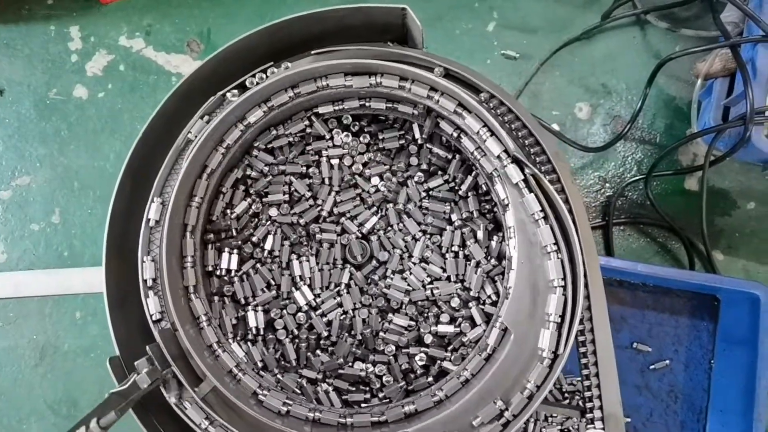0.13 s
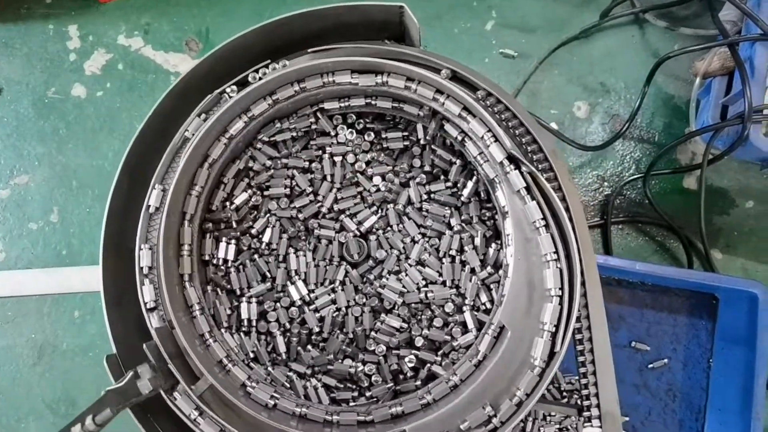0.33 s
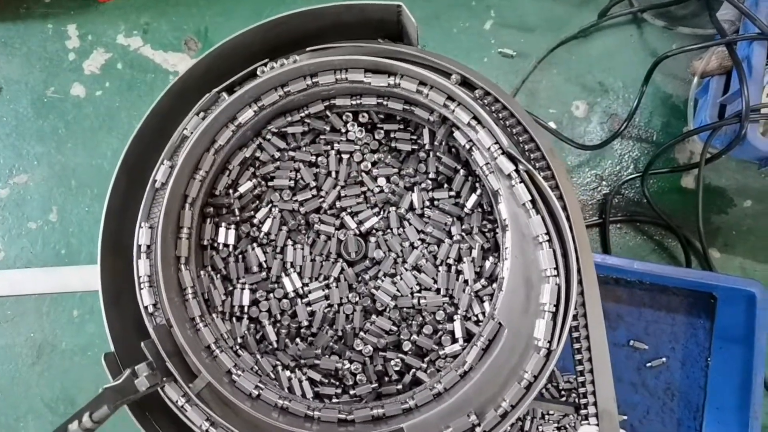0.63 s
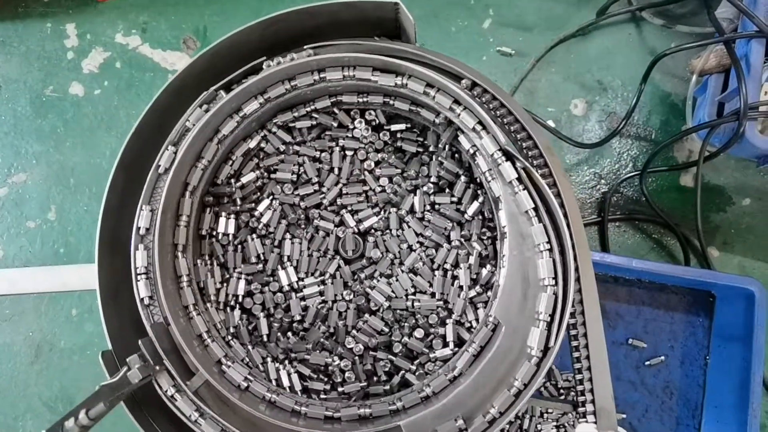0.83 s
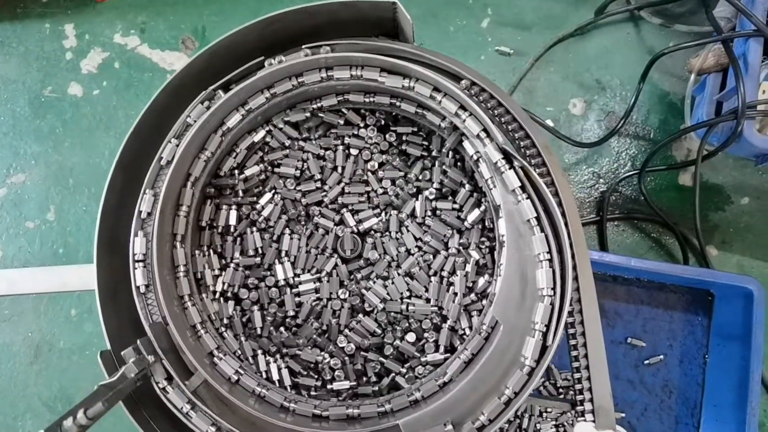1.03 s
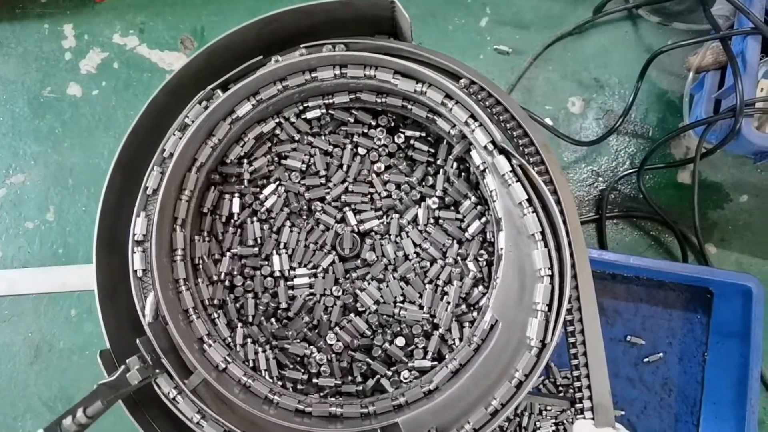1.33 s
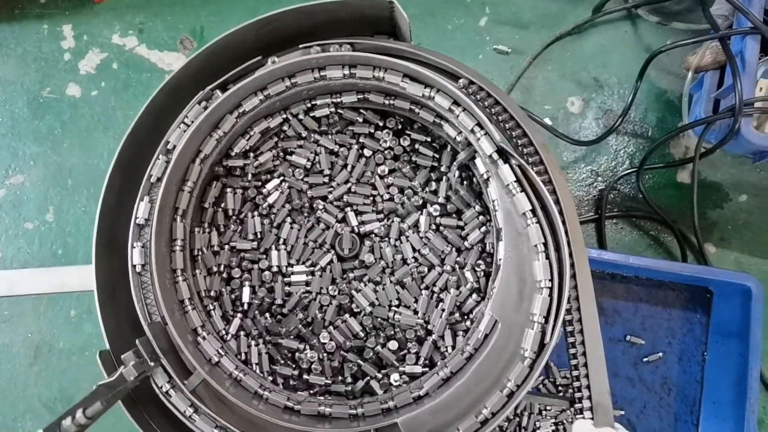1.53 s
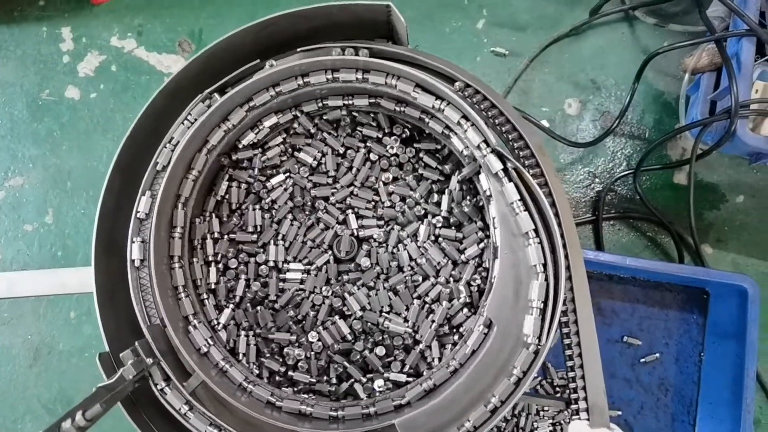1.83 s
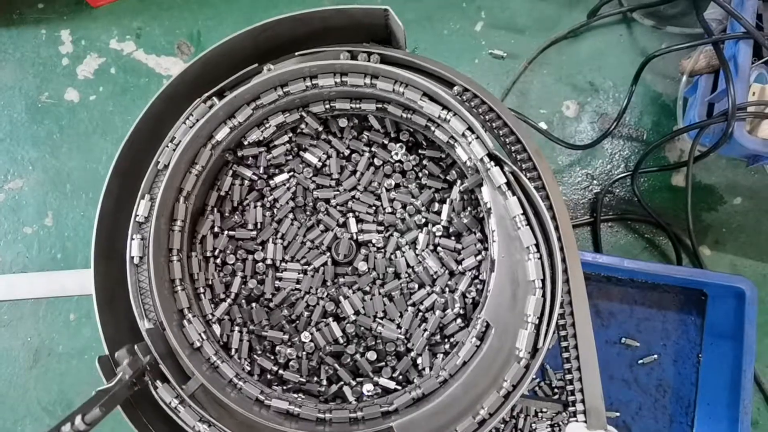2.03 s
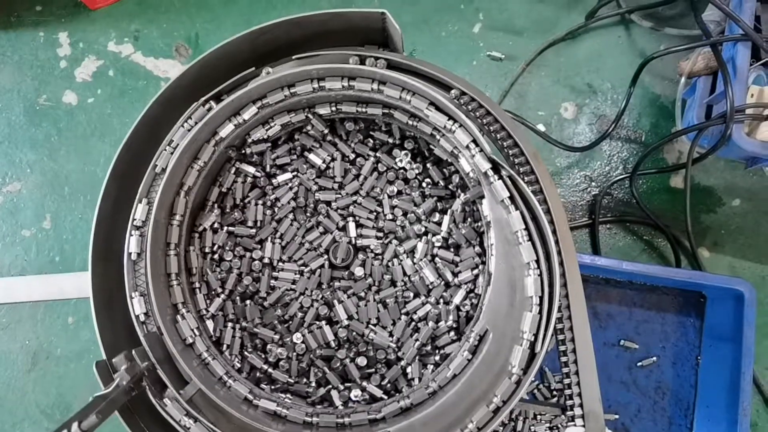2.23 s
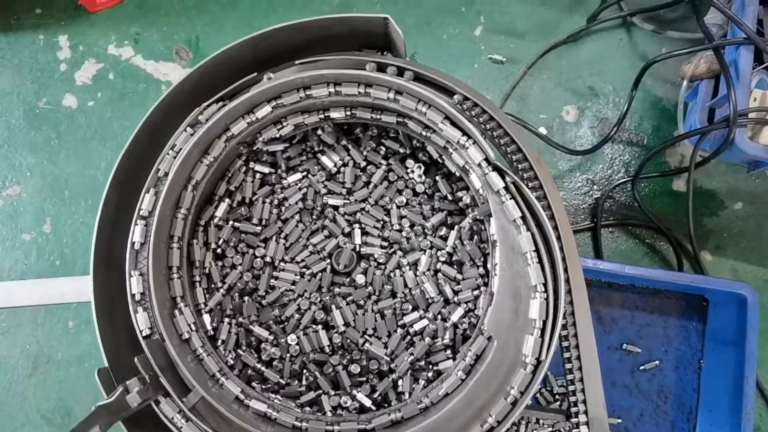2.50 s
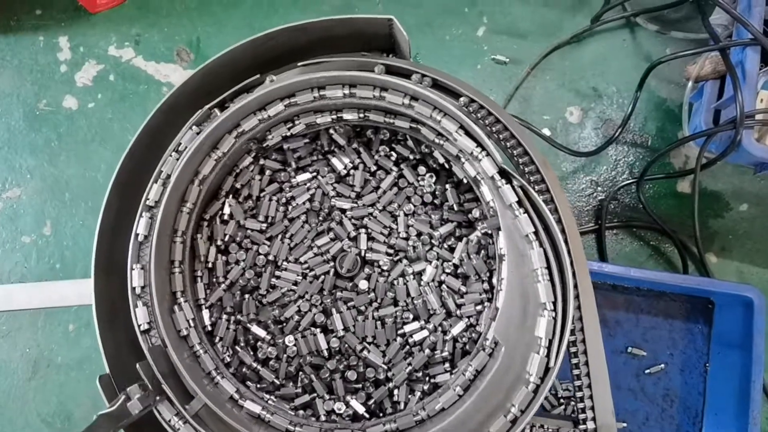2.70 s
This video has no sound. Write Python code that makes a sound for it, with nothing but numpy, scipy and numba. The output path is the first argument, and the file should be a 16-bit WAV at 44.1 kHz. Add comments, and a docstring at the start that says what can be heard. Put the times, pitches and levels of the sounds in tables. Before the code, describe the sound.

Vibratory bowl feeder buzzing fast, jostling a heap of tiny metal parts with bright continuous clatter

```python
"""A mains-driven bowl feeder shakes a heap of small steel parts, heard from above by a phone.
From the start, parts are thrown and land twice a stroke: thousands of collisions click and ring.
Under them the magnet drive hums, a motor drones nearby and the workshop rumbles (filtered noise).
From a quarter of a second on, harder knocks stand out: each clicks, rings many tones and bounces twice.
The rattle dips briefly near 0.28, 1.8 and 2.72 s; the last knock falls at 2.43 s and the drone sinks at the end."""
import sys
import numpy as np
from scipy import signal
from scipy.fft import rfft, irfft
from scipy.io import wavfile
from scipy.ndimage import uniform_filter1d
from numba import njit

SR = 44100
rng = np.random.default_rng(int(sys.argv[2]) if len(sys.argv) > 2 else 0)


def digitize_waveform(pressure):
    """Quantize a signal to 16-bit integers and store it at the path in sys.argv[1].

    Rows of a 2-D input are taken as channels; values are limited to [-1, 1].
    """
    field = np.atleast_2d(pressure).T
    bounded = np.clip(field, -1, 1)
    quanta = np.round(bounded * 32767).astype(np.int16)
    wavfile.write(sys.argv[1], SR, quanta)


N = 126126  # length in samples

DRIVE_HZ, DRIVE_START_TURNS = 49.973, .7  # one turn is one stroke
MOTOR_HZ, MOTOR_START_TURNS = 43.27, .4
MAIN_RING_LOW_HZ, MAIN_RING_HIGH_HZ = 3400, 4800  # band of the main ring


def undb(db):
    """Turn decibels into gain."""
    return 10 ** (np.asarray(db) / 20)


def level(x, db):
    """Scale a sound to an rms level in dB."""
    return x * undb(db) / np.sqrt(np.mean(x ** 2))


def curve(table, column):
    """Draw straight lines through a table column: one value per sample."""
    table = np.array(table, float)
    return np.interp(np.arange(N) / SR, table[:, 0], table[:, column])


def colour(x, points):
    """Shape a spectrum by (frequency [Hz], level [dB]) points, joined on a log frequency scale."""
    points = np.array(points, float)
    hz = np.maximum(np.arange(N // 2 + 1) * SR / N, 1)
    db = np.interp(np.log(hz), np.log(points[:, 0]), points[:, 1])
    return irfft(rfft(x) * undb(db), N)


def walk(rate):
    """Wander randomly around 0 with a spread near 1: values held 1 / rate seconds, smoothed twice."""
    hold = int(SR / rate)
    steps = np.repeat(rng.standard_normal(N // hold + 1), hold)
    smooth = uniform_filter1d(uniform_filter1d(steps, hold), hold)
    return 1.3 * smooth[:N]  # make up for the spread lost in smoothing


# landings in one stroke: (place [turns], width [turns], share)
LANDINGS = [(.54, .075, 1.5), (.03, .07, .6)]
# loudness of the rattle before the overall lift: (time [s], level [dB])
RATTLE_LEVEL = [(0.0, -26), (0.22, -27), (0.25, -27), (0.28, -28), (0.33, -25.5), (0.48, -26.5),
                (1.78, -26), (1.8, -28.5), (1.85, -26), (2.72, -27.5), (2.86, -27)]
# the main ring swells, sags and wanders as the heap shifts: (time [s], level [dB], centre [Hz])
MAIN_RING_LEVEL = [(0, 5.5, 3960), (.17, 8, 3930), (.27, 1.5, 4000), (.33, 3, 4070), (.45, 4, 4040),
                   (.67, 6.5, 4240), (.9, 3.5, 3830), (1.0, 3.5, 4220), (1.28, -1, 4070), (1.35, 6, 3850),
                   (1.44, 5, 4150), (1.52, 2, 3860), (1.8, 1.2, 4300), (1.95, 1, 4150), (2.3, 2.5, 4000),
                   (2.55, 2, 4040), (2.7, 5, 4000), (2.86, 2, 3900)]
MAIN_RING_WIDTH_HZ = 540
STEADY_SHARE, HITS_PER_S, HIT_SCATTER_DB = .32, 5500, 2.5
HIT_CAP = .99  # the rarest, hardest hits are left to the knocks
SURGE, SURGE_PER_S = .1, 14
CLICK_DB, RING_DB, RATTLE_DB = 1, -0.5, 2  # click and ring balance, then the overall lift
RING_SCATTER_DB = 4.5


def rattle():
    """Collisions crowd at the two landings of each stroke and come in surges."""
    turns = DRIVE_HZ * np.arange(N) / SR
    density = STEADY_SHARE
    for place, width, share in LANDINGS:
        from_landing = (turns - place + .5) % 1 - .5
        density = density + share * np.exp(-.5 * (from_landing / width) ** 2)
    density = density * np.exp(SURGE * walk(SURGE_PER_S))

    draw = rng.random((N, 4))
    start = np.flatnonzero(draw[:, 0] < HITS_PER_S / SR * density / density.mean())
    draw = draw[start]
    # many soft hits, few hard ones, pushing either way
    strength = undb(-HIT_SCATTER_DB * np.log(1 - HIT_CAP * draw[:, 2]))
    gain = np.sign(draw[:, 1] - .5) * strength

    # each hit rings one mode, lifted more when it lies near the main ring's centre
    picks = (draw[:, 3:] * len(MODES)).astype(int)
    hz = np.array(MODES)[picks, 0]
    off = (hz - curve(MAIN_RING_LEVEL, 2)[start, None]) / MAIN_RING_WIDTH_HZ
    in_band = (hz > MAIN_RING_LOW_HZ) * (hz < MAIN_RING_HIGH_HZ)
    main_db = (curve(MAIN_RING_LEVEL, 1)[start, None] + 2 - 10 * off ** 2) * in_band

    clicks, rings = collide(start, gain, picks, hz, main_db, RING_SCATTER_DB)
    balanced = level(clicks, CLICK_DB) + level(rings, RING_DB)
    return balanced * undb(RATTLE_DB + curve(RATTLE_LEVEL, 1))


# harder knocks, levels relative: (time [s], strength [dB], extra for modes under the main ring [dB],
# extra for modes over it [dB], loudest ring [Hz])
KNOCKS = [(0.245, -27.5, -26, 6.5, 6870), (.528, -23, -10, -4, 6100), (.687, -33, -8, 6.5, 6330),
          (0.969, -28, -8, -1, 7120), (1.029, -32, -8, 1.5, 9600), (1.109, -27, -8, -4, 6900),
          (1.241, -34, 4, 9.5, 11740), (1.369, -26, -8, -3, 3890), (1.470, -34, -8, 7.5, 7320),
          (1.549, -29, 9, 8, 2370), (1.589, -36, -6, -11, 3930), (1.77, -28.5, 8, 4, 6330),
          (1.848, -22, -6, -10, 4260), (1.871, -23, 9, -11, 2100), (2.048, -23, -15, 0.5, 7950),
          (2.17, -32.5, 7, 8.5, 2400), (2.309, -20.5, -12, -3.5, 3950), (2.429, -28, -2, -4, 6130)]
# a small part radiates little bass and much treble: (frequency [Hz], level [dB])
KNOCK_COLOUR = [(1000, -24), (1900, 0), (5000, 0), (12000, 4)]
KNOCK_CLICK_DB, KNOCK_RING_DB, LOUDEST_RING_DB = 18, -8, 7.5
KNOCK_BOUNCE_S = .0013  # from the knock to its first bounce
KNOCK_DAMPING = 0.41  # share of the usual ring time
LOW_RING_HZ = 1900  # the extra under the main ring starts here


def knocks():
    """A part drops hard, rings all its modes, one lifted above its usual level, and bounces twice."""
    rows = np.repeat(np.array(KNOCKS, float), 3, axis=0)
    bounce = np.arange(len(rows)) % 3
    start = ((rows[:, 0] + KNOCK_BOUNCE_S * bounce ** 2.6) * SR).astype(np.int64)
    gain = undb(rows[:, 1] - 2 * bounce)  # each bounce is 2 dB softer

    picks = np.tile(np.arange(len(MODES)), (len(rows), 1))
    hz = np.array(MODES)[picks, 0]
    under = (hz < MAIN_RING_LOW_HZ) * (hz > LOW_RING_HZ)
    over = hz > MAIN_RING_HIGH_HZ
    extra_db = rows[:, 2:3] * under + rows[:, 3:4] * over

    # the mode nearest the loudest ring takes its pitch
    loudest = picks == np.abs(hz - rows[:, 4:]).argmin(axis=1)[:, None]
    centre_hz = np.where(loudest, rows[:, 4:], hz)
    clicks, rings = collide(start, gain, picks, centre_hz, extra_db + LOUDEST_RING_DB * loudest,
                            scatter_db=1.0, ring_share=KNOCK_DAMPING, spread=0.69)
    return colour(undb(KNOCK_CLICK_DB) * clicks + undb(KNOCK_RING_DB) * rings, KNOCK_COLOUR)


# rings of a part against the bowl, before each collision's own changes:
# (frequency [Hz], spread [Hz], level [dB], time to fade by 60 dB [s])
MODES = [(783.8, 25.5, -16, 0.15), (980, 29.6, -18.5, .12), (1520, 113, -9, 0.1), (2025, 40, -7.5, 0.091),
         (2400, 112.4, -1, 0.12), (3015, 167, -1.5, 0.084), (3825, 69.5, -0.5, 0.088),
         (4150, 121, -0.5, 0.086), (4470, 61, -2.5, 0.13), (6120, 232, 3.5, 0.081), (7180, 405, 4, 0.06),
         (8530, 400, -1.5, 0.096), (9600, 266, 3, 0.033), (11690, 700, 1.5, 0.061)]
# colour of the bare clicks: (frequency [Hz], relative level per Hz [dB])
CLICK_COLOUR = [(300, -27), (700, -17), (1150, -15.5), (1450, -16), (1800, -16), (2300, -8.5), (3000, -5.5),
                (3500, -5.5), (4600, -8.5), (5200, -6.5), (5600, -4.5), (7000, -3), (9500, -3), (12200, -9),
                (13200, -10), (14100, -12.5), (16000, -14.5)]
RING_SWAY_DB, RING_RISE_S = 1.04, 0.00061


def collide(start, gain, picks, centre_hz, extra_db, scatter_db, ring_share=1, spread=1):
    """Each collision clicks and rings some of the modes, slightly off pitch every time."""
    modes = np.array(MODES, float)
    arrive, path_gain = paths(start)
    clicks = np.zeros((2, N + 3001))  # room for the latest bounce
    for channel in range(2):
        np.add.at(clicks[channel], arrive[:, channel], gain[:, None] * path_gain[:, channel])

    chance = rng.standard_normal(picks.shape + (2,))
    hz = centre_hz + spread * modes[picks, 1] * chance[..., 0]
    scatter = scatter_db * np.clip(chance[..., 1], -2, 2)
    # each mode also sways slowly in level
    sway = np.array([walk(15) for _ in modes])[picks, start[:, None]]
    db = modes[picks, 2] + scatter + RING_SWAY_DB * sway + extra_db

    # one row per ring, not per collision
    wide_arrive = np.repeat(arrive, picks.shape[1], axis=0)
    wide_gain = np.repeat(path_gain, picks.shape[1], axis=0)
    ring_gain = (gain[:, None] * undb(db)).ravel()
    t60 = ring_share * modes[picks, 3].ravel()
    rings = ring(wide_arrive, wide_gain, hz.ravel(), ring_gain, t60, RING_RISE_S, N, 1. * SR)
    return colour(clicks[:, :N], CLICK_COLOUR), rings


@njit
def ring(arrive, path_gain, hz, gain, t60, rise, n, sr):
    """Each row is one fading sine, added in each channel once for every path."""
    out, wave = np.zeros((2, n + 12000)), np.empty(8000)
    for j in range(len(hz)):
        # turning and shrinking a complex number each sample makes the fading sine
        step = np.exp(2j * np.pi * hz[j] / sr - np.log(1000.) / (t60[j] * sr))
        z, size = gain[j] + 0j, min(int(.6 * t60[j] * sr), 8000)
        for i in range(size):
            wave[i] = z.imag * min(i / (rise * sr), 1.)
            z *= step
        for channel in range(2):
            for k in range(3):
                at, g = arrive[j, channel, k], path_gain[j, channel, k]
                for i in range(size):
                    out[channel, at + i] += g * wave[i]
    return out[:, :n]


LAG_S, LAG_SPREAD_S = .00023, .0001  # the right hears later: average, most it strays either way
ECHO_DELAY_S, ECHO_DB = .003, -0.5  # average bounce delay before the limit, bounce level
RIM_LAG_S, RIM_GAIN = .00057, -0.27  # one early right bounce, upside down


def paths(start):
    """Sound reaches each channel directly and by two bounces off the steel walls of the bowl."""
    draw = rng.random((len(start), 2, 3, 2))
    delay = -ECHO_DELAY_S * np.log(1 - draw[..., 0])
    gain = np.sign(draw[..., 1] - .5) * undb(ECHO_DB)
    # path 0 is direct
    delay[:, 0, 0] = 0
    delay[:, 1, 0] = LAG_S + LAG_SPREAD_S * (draw[:, 0, 0, 0] + draw[:, 0, 0, 1] - 1)
    gain[:, :, 0] = 1
    # the right's first bounce follows its direct sound by a fixed time
    delay[:, 1, 1] = delay[:, 1, 0] + RIM_LAG_S - LAG_S
    gain[:, 1, 1] = RIM_GAIN
    late = np.clip(np.round(delay * SR), 0, 3000).astype(np.int64)
    return start[:, None, None] + late, gain


# hum of the magnet drive before its level drifts: (multiple of the drive rate, rms level [dB])
DRIVE_ORDERS = [(2, -37), (3, -56.5), (4, -56.5), (5, -58.5), (6, -53.5), (7, -48.5), (10, -59),
                (11, -62.5)]
# loudness drifts as the phone moves: (time [s], drive level [dB], motor level [dB])
HUM_LEVEL = [(0, 2, -2), (.7, 2.5, -0.5), (1.5, 2.5, 0), (2.2, 1, -4), (2.5, -1, -3.5), (2.86, 0.5, -8)]
# the ninth multiple of the drive breaks up and returns: (time [s], level [dB])
NINTH_LEVEL = [(0, 4), (.2, 5), (.27, -15), (.48, 5), (.75, -4.5), (.86, 13.5), (.92, -12), (1.0, 4),
               (1.25, 5), (1.5, 6.5), (1.62, -1.5), (1.98, 6), (2.03, -10), (2.15, 1), (2.8, 2),
               (2.86, -14)]
HUM_WAVER_DB, NINTH_WAVER_DB = 0.42, 0.28  # per multiple
NINTH_DB = -47.5  # before its own drift


def drive_hum():
    """The magnet drive hums at multiples of its rate; the ninth comes and goes on its own."""
    hum = tones(DRIVE_HZ, DRIVE_START_TURNS, DRIVE_ORDERS, HUM_WAVER_DB)
    ninth = tones(DRIVE_HZ, DRIVE_START_TURNS, [(9, NINTH_DB)], NINTH_WAVER_DB)
    return hum * undb(curve(HUM_LEVEL, 1)) + ninth * undb(curve(NINTH_LEVEL, 1))


# drone of the motor before its level drifts: (multiple of the motor rate, rms level [dB])
MOTOR_ORDERS = [(2, -37), (3, -39), (5, -59.5)]
MOTOR_WAVER_DB = 0.86  # per multiple


def motor_drone():
    """A nearby motor drones at multiples of its own, slower rate."""
    drone = tones(MOTOR_HZ, MOTOR_START_TURNS, MOTOR_ORDERS, MOTOR_WAVER_DB)
    return drone * undb(curve(HUM_LEVEL, 2))


WOBBLE_TURNS = 0.0078


def tones(hz, start_turns, orders, waver_db):
    """Multiples of a slightly unsteady rate sound together; the higher ones waver more."""
    turns = hz * np.arange(N) / SR + start_turns + WOBBLE_TURNS * walk(12)
    total = 0
    for k, db in orders:
        peak = np.sqrt(2) * undb(db + waver_db * k * walk(9.26))
        total = total + peak * np.cos(2 * np.pi * k * turns)
    return total


# workshop rumble: (frequency [Hz], relative level per Hz [dB])
SHOP = [(20, -19), (36, -0.5), (52, -6), (75, -3.5), (110, -4.5), (170, -8), (300, -10), (410, -13.5),
        (450, -7), (520, -17.5), (700, -19.5), (900, -24.5), (1200, -39), (3000, -29.5)]
SHOP_DB, SHOP_SWELL_DB = -34.5, 1  # rms level before the slow swell, spread of the swell
SHOP_WIDE_HZ, SHOP_SIDE_DB = 1510, -8.5  # full width from here up, width at 100 Hz


def shop():
    """Coloured noise rumbles, mostly shared by both channels in the bass and wider above."""
    mid, side = colour(rng.standard_normal((2, N)), SHOP)
    side = colour(side, [(40, -18), (100, SHOP_SIDE_DB), (350, -15), (SHOP_WIDE_HZ, 0)])
    stereo = mid + side * np.array([[1], [-1]])
    return level(stereo, SHOP_DB) * undb(SHOP_SWELL_DB * walk(12.34))


LEFT_DB = -0.5  # left level over right, for the whole mix


def scene():
    """Rattle and knocks in the bowl sound over hum, drone and rumble."""
    hum = drive_hum() + motor_drone()
    hum = hum * undb(np.array([[.6], [-.6]]))  # hum leans left
    mix = rattle() + knocks() + hum + shop()
    return mix * undb(np.array([[LEFT_DB], [-LEFT_DB]]) / 2)


TOP_HZ = 15750


def record(dry):
    """The phone cuts the top with a very steep low-pass filter."""
    steep = signal.ellip(18, .3, 90, TOP_HZ, fs=SR, output="sos")
    return signal.sosfilt(steep, dry)


dry = scene()
out = record(dry)
digitize_waveform(out)
```